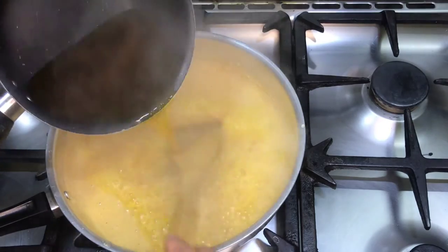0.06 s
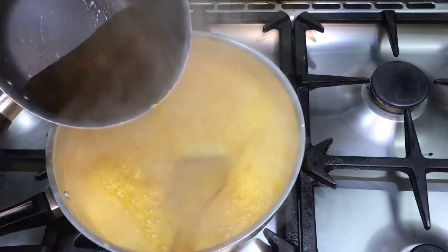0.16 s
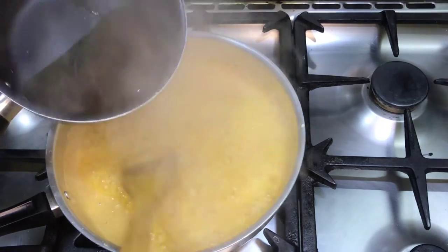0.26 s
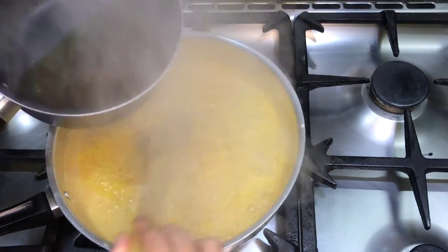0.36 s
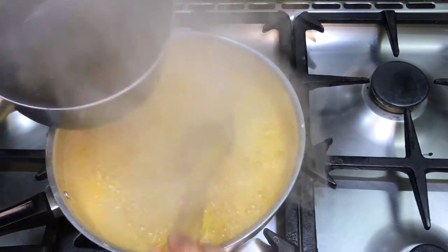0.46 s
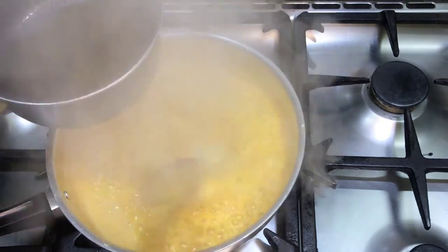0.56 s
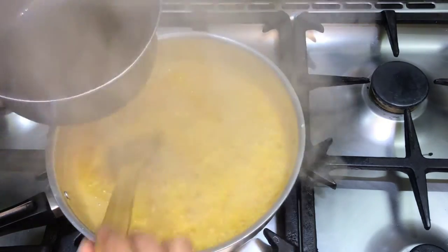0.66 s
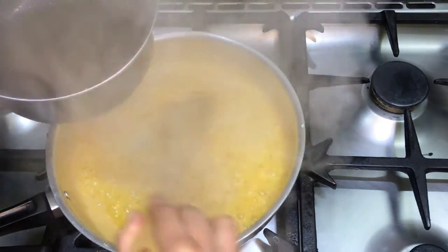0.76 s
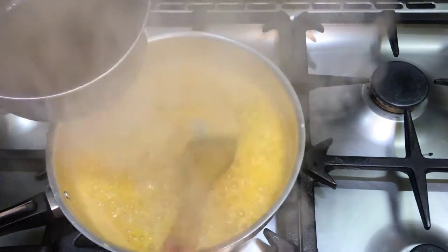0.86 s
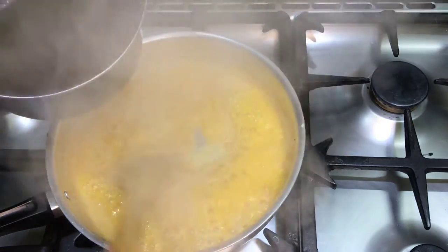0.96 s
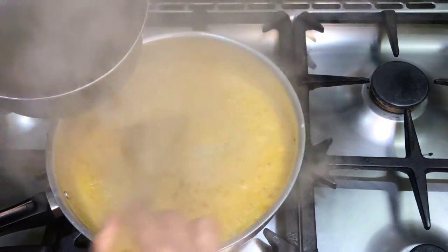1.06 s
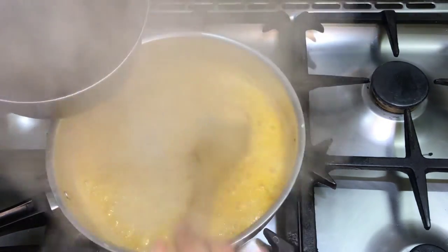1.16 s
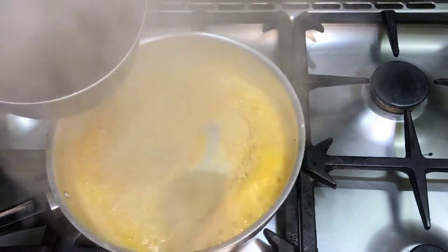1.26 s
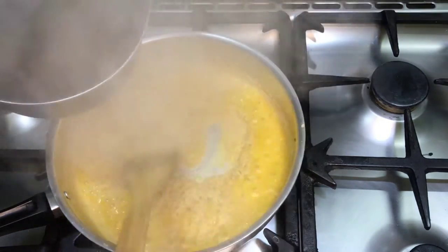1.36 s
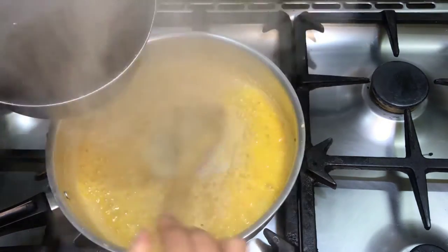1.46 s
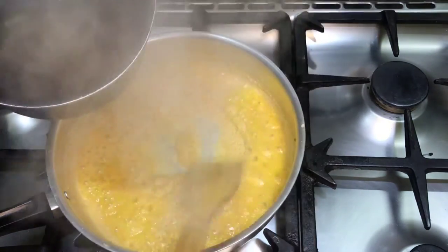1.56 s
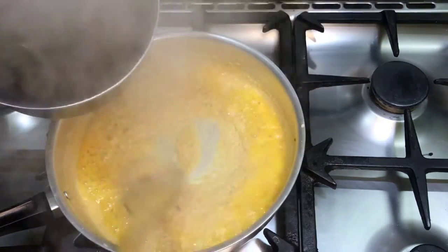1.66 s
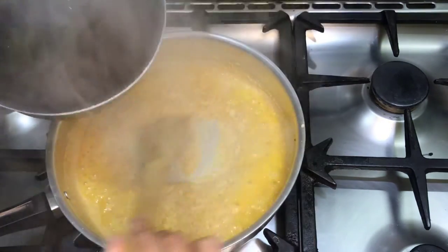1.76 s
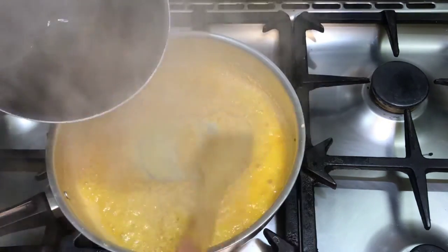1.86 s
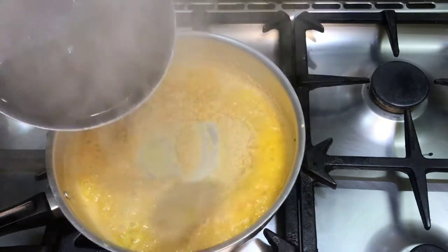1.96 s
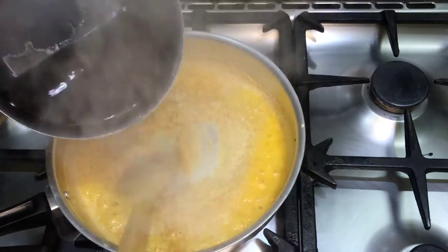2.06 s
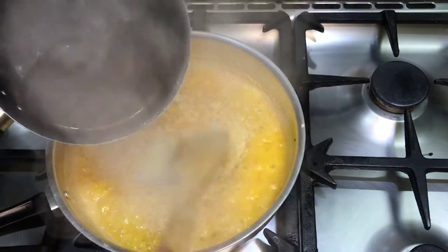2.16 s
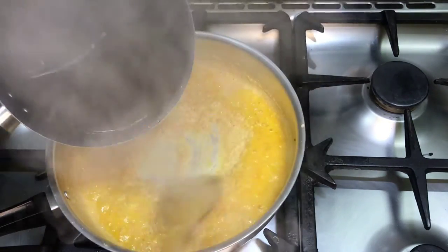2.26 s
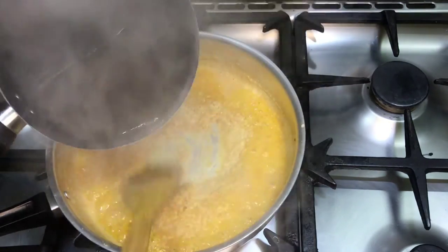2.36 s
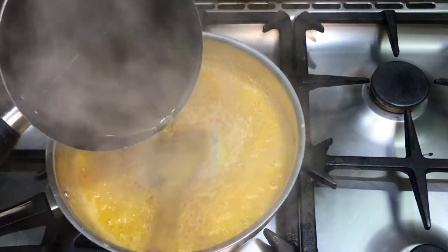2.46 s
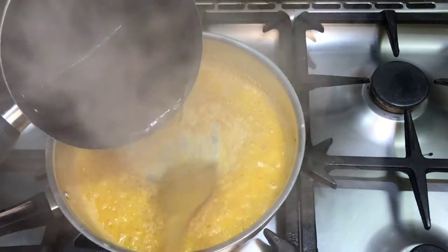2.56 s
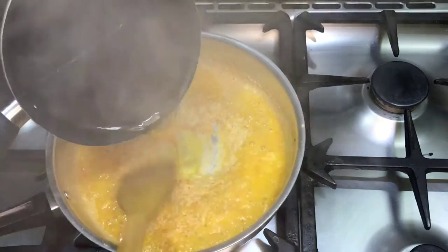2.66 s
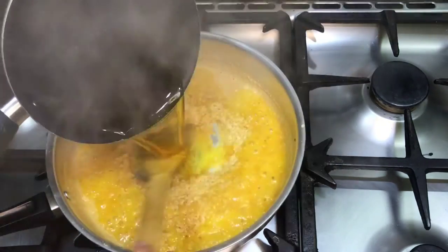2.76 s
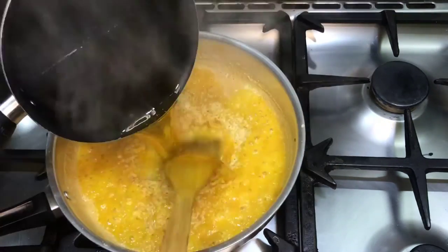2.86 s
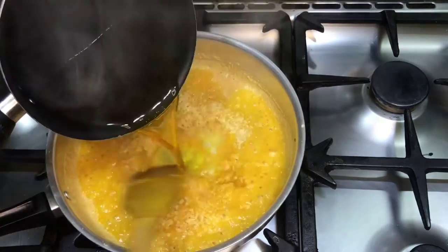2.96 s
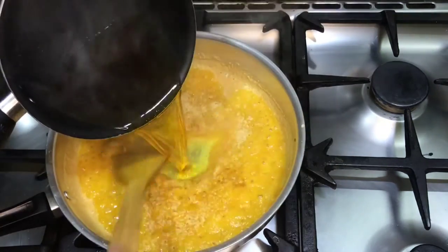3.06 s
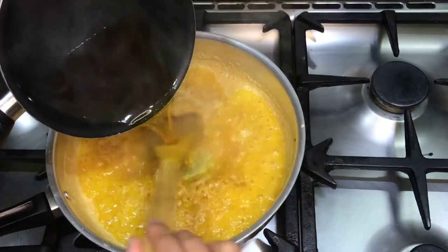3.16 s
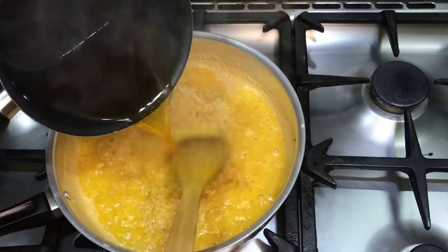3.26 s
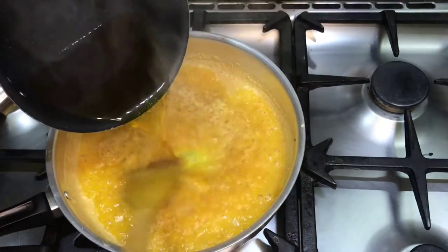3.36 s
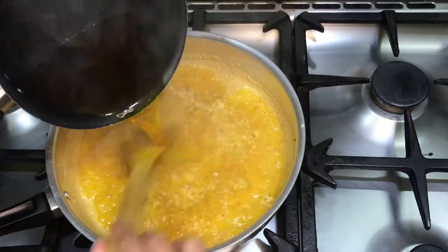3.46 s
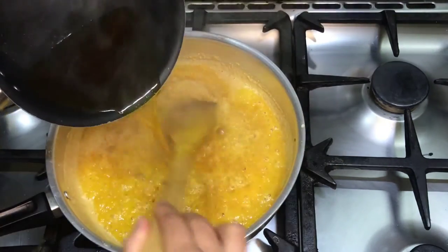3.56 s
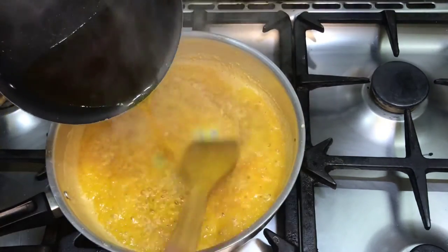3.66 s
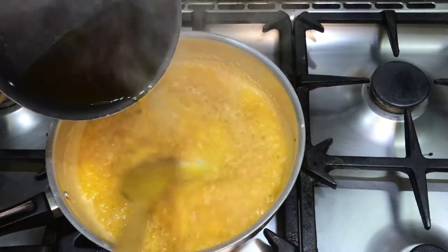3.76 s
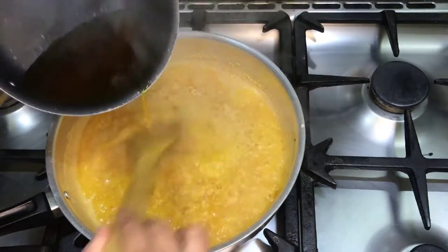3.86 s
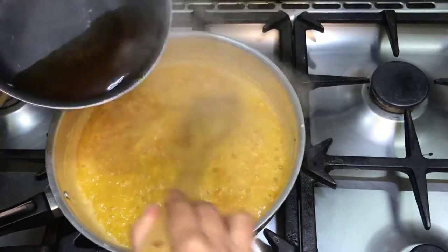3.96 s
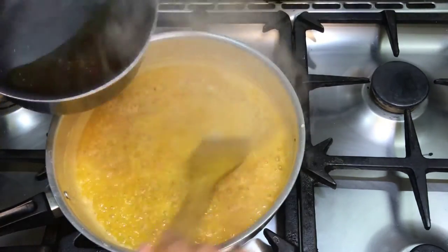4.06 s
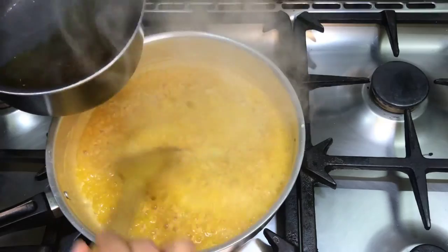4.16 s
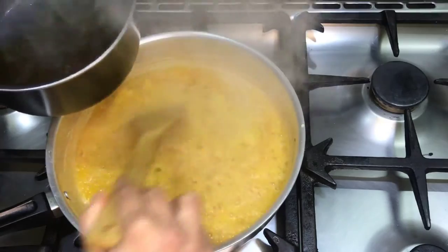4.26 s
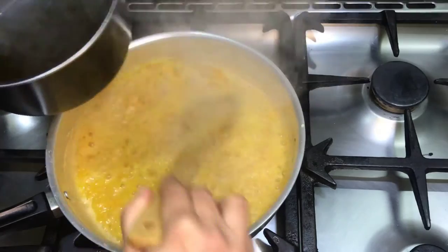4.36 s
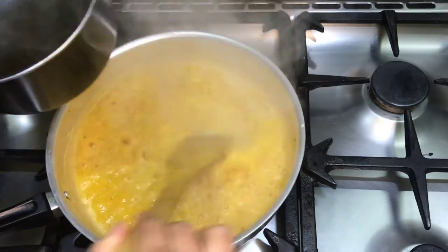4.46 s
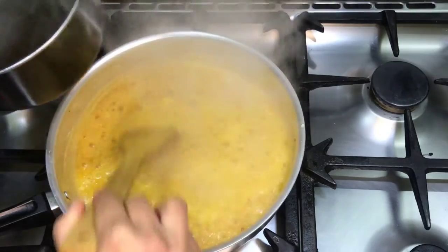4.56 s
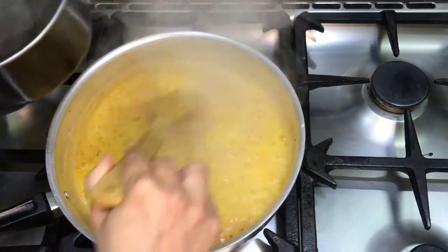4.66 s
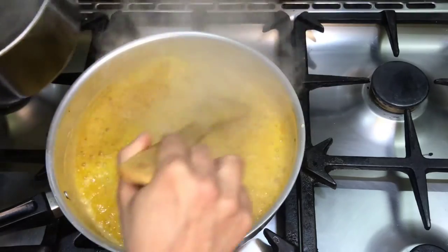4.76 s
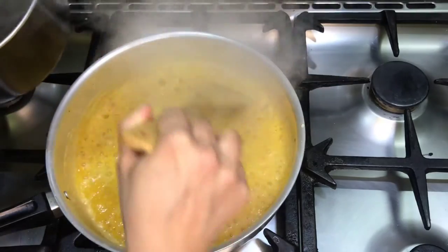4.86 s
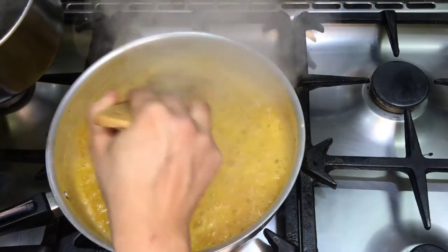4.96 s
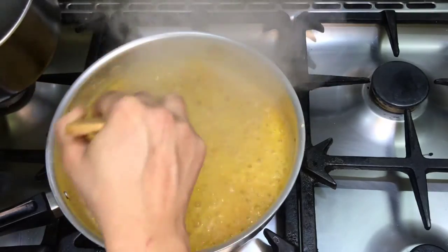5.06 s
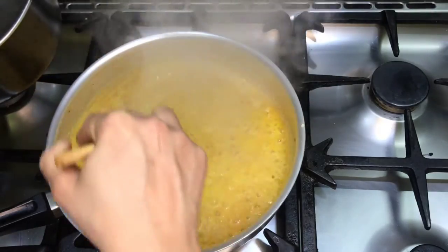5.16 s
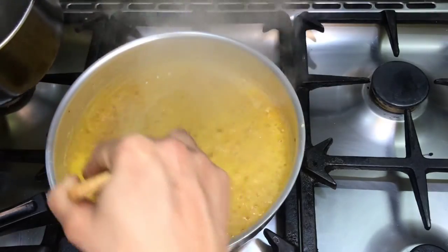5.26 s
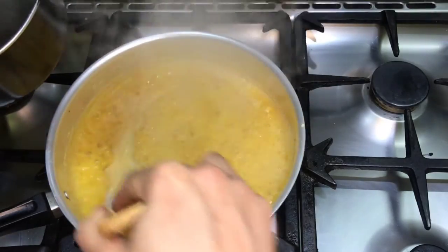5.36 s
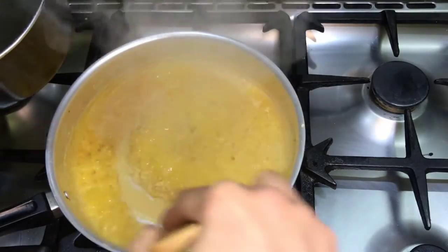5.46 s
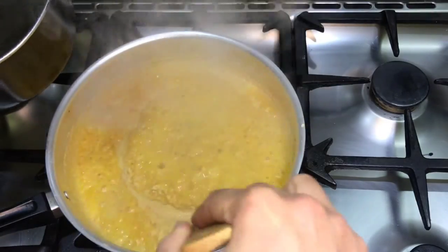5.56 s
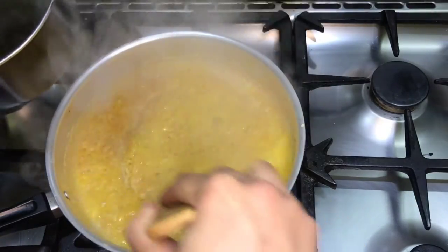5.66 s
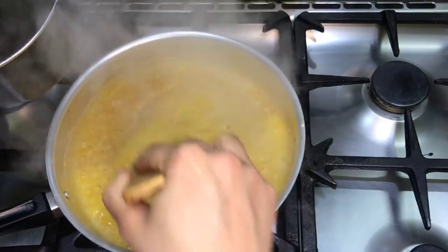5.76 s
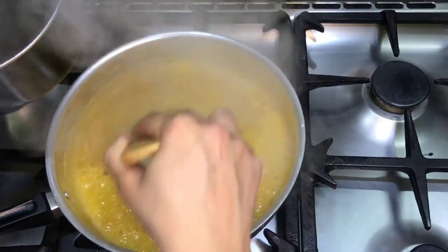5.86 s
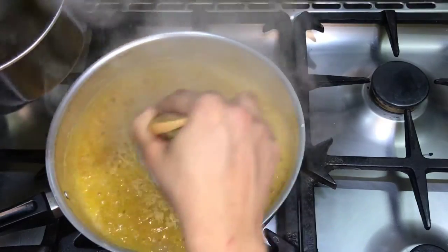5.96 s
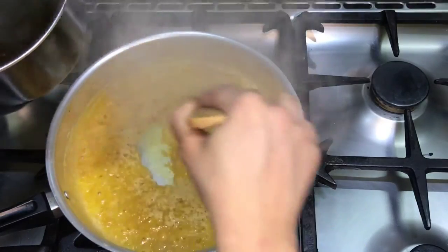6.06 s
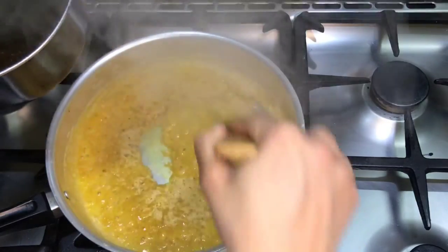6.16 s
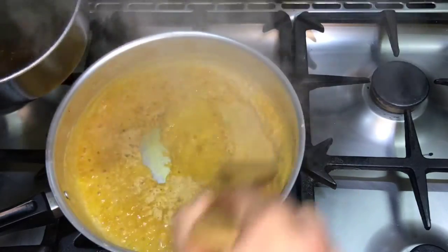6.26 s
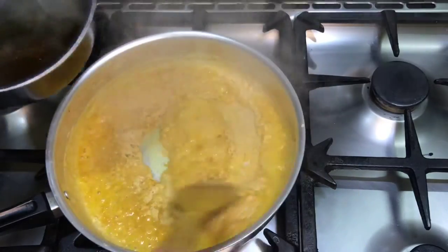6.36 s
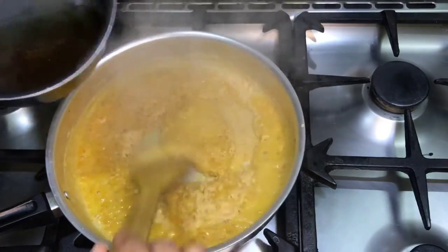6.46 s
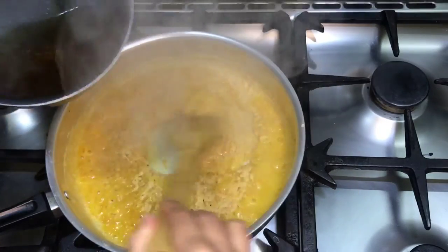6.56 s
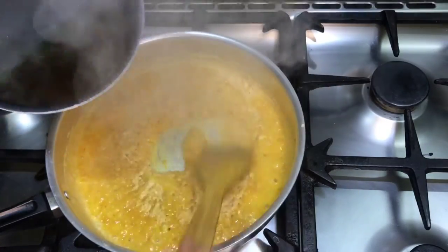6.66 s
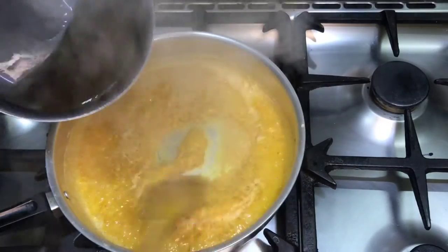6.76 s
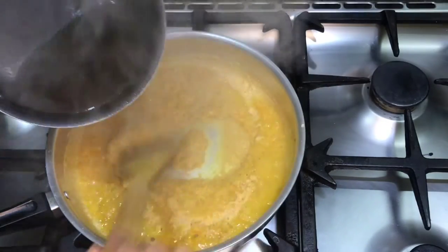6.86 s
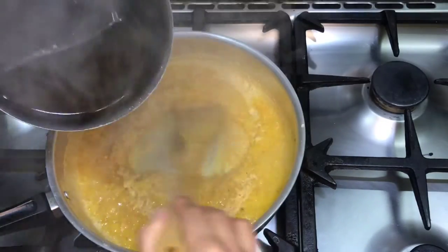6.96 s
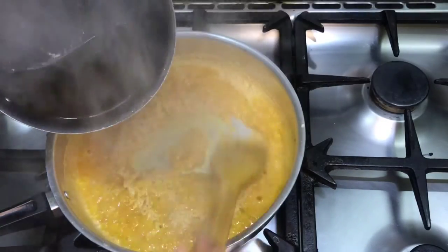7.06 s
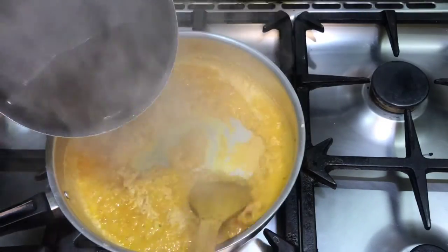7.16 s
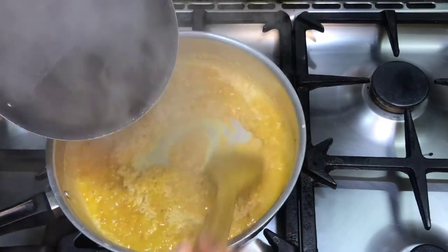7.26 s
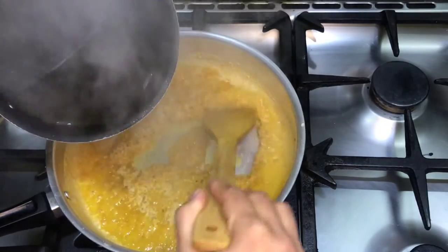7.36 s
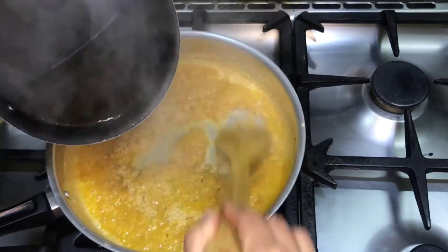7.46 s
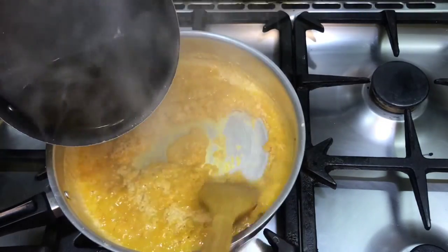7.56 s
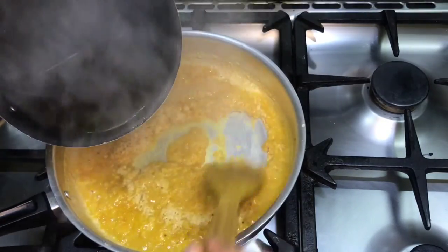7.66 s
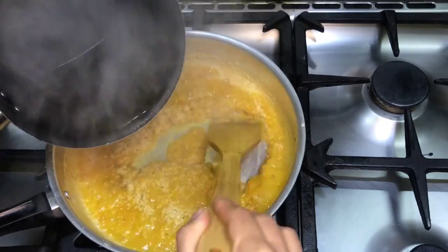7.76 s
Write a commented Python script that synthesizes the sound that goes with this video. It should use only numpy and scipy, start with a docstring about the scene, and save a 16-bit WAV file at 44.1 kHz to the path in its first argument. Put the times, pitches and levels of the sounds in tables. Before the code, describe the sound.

Close, bright sizzling flares and ebbs as syrup hits a bubbling pan twice, with dull spoon knocks and faint low motor drone behind.

```python
"""At a kitchen hob, hot syrup is poured twice into a pan of hot fat, close to a phone with one microphone.
Water flashes to steam: filtered random clicks hiss and fry, and short rising tones boil up through the foam.
Fresh syrup sings through narrow moving resonances, and large bubbles ring out or spit.
A wooden spoon scrapes and knocks the pan: noisy rubbing and decaying tones.
Under it all lies filtered low noise with swelling tones, while motors drone outside as wavering sines."""
import sys
import numpy as np
from scipy import signal
from scipy.fft import rfft, irfft
from scipy.io import wavfile
from scipy.ndimage import uniform_filter1d

SR = 44100
rng = np.random.default_rng(int(sys.argv[2]) if len(sys.argv) > 2 else 0)


def log_audio(samples):
    """Write samples as a 16-bit WAV file to the path given in sys.argv[1]."""
    # one column per channel
    frames = np.atleast_2d(samples).T
    # limit to full scale, then quantise
    limited = np.clip(frames, -1, 1)
    pcm = np.round(limited * 32767).astype(np.int16)
    wavfile.write(sys.argv[1], SR, pcm)


N = 343980
TIME = np.arange(N) / SR  # s
FREQS = np.fft.rfftfreq(N, 1 / SR)  # Hz

# In every table below, the length of a bell-shaped sound is its width at half height.

# low rumble: its tone colour (frequency [Hz], gain [dB])
RUMBLE_COLOUR = [(25, -23), (50, -9), (95, -2), (170, -5), (225, -14), (320, -7.5), (460, -21.5),
                 (680, -9.5), (1200, -19), (4000, -59)]
# pitches the room strengthens (frequency [Hz], width [Hz], gain [dB])
ROOM_MODES = [(102.7, 16, 4.7), (126.4, 3, 5.3), (178.2, 18.5, 7.6)]
# low tones that swell and fade in the rumble (middle [s], length [s], frequency [Hz], level [dB])
RUMBLE_SWELLS = [(0.433, .5, 74, -46), (0.673, 0.32, 175.5, -46), (.7, 0.6, 99, -46),
                 (2.172, 0.33, 132, -43.5), (2.254, 0.22, 102, -45), (2.455, 0.26, 225, -48),
                 (2.546, 0.27, 92, -39.5), (2.775, 0.17, 130.5, -40), (2.95, 0.61, 109.7, -44.5),
                 (3.21, 0.17, 180, -43.5), (4.275, 0.095, 178.5, -41), (4.4, 0.8, 131, -48),
                 (5.934, 0.23, 174.6, -46), (6.11, 0.76, 132, -48), (6.46, 0.52, 109.2, -47)]
# a wavering motor outside (time [s], firing rate [Hz], level [dB])
FAR_MOTOR = [(0, 74.5, -43.5), (.45, 74.5, -45), (.72, 77, -43), (1.0, 73.5, -52), (1.27, 76, -42.5),
             (1.5, 68, -47.5), (1.8, 74, -56), (2.12, 79, -51), (2.4, 73.3, -37.5), (2.65, 78, -46),
             (2.95, 74, -59), (3.35, 74.5, -41), (3.6, 77, -45), (3.95, 76, -48.5), (4.4, 75, -75)]
# strength of that motor's harmonics 1, 2 and 3 (gain [dB])
FAR_HARMONICS_DB = [-22, -0.5, -19]
# a deeper motor swells and fades (middle [s], length [s], pitch [Hz], pitch rise [Hz/s], level [dB])
DEEP_PASSES = [(3.147, 0.59, 57.3, 10, -41), (3.648, 0.45, 61.2, 1, -46), (7.103, 1.5, 57.7, 1, -54)]
RUMBLE_LEVEL_DB = -55  # of the rumble's 80-105 Hz band

# syrup runs into the pan (start [s], length [s])
POURS = [(-0.3, 0.72), (2.873, 0.96)]
POUR_ATTACK_S = 0.051
# fresh syrup meets hot metal and flares up (start [s], hold [s], hiss level [dB], frying level [dB])
FLARES = [(-0.07, 0.11, -23.5, -27.5), (0.148, 0.083, -26.5, -30), (0.37, 0.05, -31.5, -39),
          (0.557, 0.13, -30, -34.5), (0.796, 0.043, -30.5, -35.5), (0.876, 0.023, -25, -35.5),
          (1.03, 0.04, -51, -40), (1.156, 0.52, -31.5, -39), (1.87, 0.22, -38, -46.5),
          (2.812, 0.061, -32.5, -30.5), (2.907, 0.033, -24.5, -47), (2.988, 0.054, -30, -34),
          (3.273, 0.058, -29, -34), (3.533, 0.03, -31, -34.5), (3.683, 0.11, -28, -37),
          (4.055, 0.1, -26.5, -34.5), (4.305, 0.02, -29.5, -37.5), (4.435, 0.046, -24.5, -35.5),
          (4.582, 0.073, -32.5, -53), (4.79, 0.02, -34.5, -58), (5.043, 0.087, -34.5, -63),
          (5.184, 0.57, -31.5, -39), (5.387, 0.2, -30, -40.5), (6.238, 0.16, -29, -40),
          (6.38, 0.5, -42, -42.5), (7.148, 0.036, -32.5, -41), (7.484, 0.14, -33, -43)]
FLARE_ATTACK_S, FLARE_FALL_DB_PER_S = 0.015, 56.5
# the sizzle dips briefly (middle [s], length [s], level change [dB])
SIZZLE_DIPS = [(3.095, 0.031, -6.5), (3.474, 0.03, -3)]
# tone colour of the tiny bursts (frequency [Hz], gain [dB])
HISS_COLOUR = [(2500, -46), (4500, -3.5), (6500, -2.5), (9000, -0.5), (12500, 1.5), (15500, 2)]
# tone colour of the frying (frequency [Hz], gain [dB])
FRY_COLOUR = [(500, -22), (1200, -0.5), (2100, -1.5), (3300, 2.5), (4500, 0.5), (6500, -3.5), (9000, -3.5),
              (15000, -24)]
# tone colour of the boiling (frequency [Hz], gain [dB])
BOIL_COLOUR = [(150, -20), (300, -9.5), (460, -16), (620, -5), (860, -9), (1500, -8.5), (2200, -11),
               (4000, -16)]
# pan wall and hob reflect some pitches and cancel others (frequency [Hz], width [Hz], gain [dB])
PAN_COLOUR = [(1570, 94, -0.5), (2210, 470, 2), (2745, 100, -3.5), (3040, 250, 0.5), (4960, 310, -3),
              (6240, 810, 2), (7770, 630, -1.5), (10440, 850, -4)]
# each layer: level while pouring, cooling speed, simmer level, and simmer change once the pan is fuller
HISS_POUR_DB, HISS_COOL_DB_PER_S, HISS_SIMMER_DB, HISS_FULLER_DB = -40, 0.5, -45.5, 6.5
FRY_POUR_DB, FRY_COOL_DB_PER_S, FRY_SIMMER_DB, FRY_FULLER_DB = -35.5, 14, -42.5, -0.5
BOIL_POUR_DB, BOIL_COOL_DB_PER_S, BOIL_SIMMER_DB, BOIL_FULLER_DB = -36.5, 12.5, -53, 6.5
BOIL_LINGER_S = 0.19  # the foam boils on at full strength after the stream stops
BOIL_SURGE_DB, BOIL_SURGES_PER_S = 0.68, 36
# the spoon opens and closes a hollow in the foam (time [s], centre [Hz], strength [dB])
HOLLOW = [(0, 1480, 7), (.15, 1350, 3), (.28, 1130, 5), (.44, 1230, 6), (.55, 1080, 7), (.68, 1280, 5),
          (.95, 1150, 2), (1.13, 1380, 8), (1.24, 1100, 5), (2.6, 1300, -3), (2.88, 1540, 9),
          (3.0, 1400, 0), (3.17, 1430, 4), (3.36, 1110, 7), (3.42, 1200, 4), (3.49, 1040, 6),
          (3.575, 1400, 11), (3.64, 1300, 4), (3.715, 1120, 10), (3.82, 1120, 0), (3.9, 1320, 6),
          (4.02, 1150, 2), (4.19, 1100, 7), (4.45, 1110, 8), (5.2, 1120, 7), (6.5, 1300, 3)]
HOLLOW_WIDTH_HZ = 320

# fresh syrup sings on bare metal (middle [s], length [s], pitch [Hz], glide [Hz/s], level [dB])
SINGS = [(0.19, 0.17, 3070, -2, -37), (2.822, .03, 2200, -3, -34.5), (2.85, 0.025, 6480, 3500, -26),
         (2.88, 0.051, 3160, 2500, -35), (2.892, 0.074, 2230, 1201, -31.5),
         (2.899, 0.017, 6100, -1500, -24), (2.976, 0.034, 6330, 0, -30), (3.005, 0.07, 2620, 1200, -37),
         (3.01, 0.067, 4130, -2000, -34), (3.04, .03, 6330, 0, -34.5), (3.17, 0.067, 3100, 4000, -38),
         (3.202, 0.13, 2270, 1100, -35.5), (3.33, .04, 6000, 0, -32), (3.352, 0.042, 2520, 800, -36),
         (3.355, 0.05, 3280, 1497, -35), (3.457, 0.12, 3070, -600, -39.5), (3.565, .06, 5600, 1497, -36),
         (3.58, .06, 3230, 0, -44), (3.69, .08, 6200, 3000, -38), (3.77, 0.13, 2090, -600, -39)]
SING_WIDTH_HZ = 150  # for a 2 kHz pocket; higher ones ring wider
SING_WANDER, SING_SPUTTER_DB = .014, 1  # pitch wobble as a share of the pitch; spread of the level
# single large bubbles surface (start [s], pitch [Hz], decay time [s], level [dB])
BLIPS = [(1.119, 1305, 0.07, -35), (1.441, 1170, 0.065, -36), (1.652, 1180, .035, -38),
         (1.798, 1320, 0.05, -37), (2.16, 1340, 0.043, -38.5), (3.245, 600, .05, -36),
         (4.812, 1050, 0.053, -39), (5.066, 1104, 0.065, -41), (5.175, 1050, 0.05, -33)]
BLIP_RISE_PER_S, BLIP_ROUGHNESS = 4.35, 0.57  # pitch rise and level wobble, as shares

# the spoon bites on the bottom and drags (start [s], length [s], level [dB])
SCRAPES = [(1.25, 0.054, -37.5), (1.35, 0.14, -43), (1.6, 0.24, -45), (1.8, 0.11, -53), (2.03, 0.18, -47),
           (2.35, 0.12, -46), (2.62, 0.025, -47), (2.68, 0.04, -46), (6.475, 0.057, -45),
           (6.545, 0.13, -47), (6.808, 0.07, -47.5), (6.9, 0.023, -40), (6.936, .035, -39.5),
           (6.99, 0.11, -52.5)]
# what the dragging spoon rings (frequency [Hz], width [Hz], gain [dB])
SCRAPE_MODES = [(684, 37, 7.5), (755, 60, 5.5), (1300, 330, -3.5), (2090, 150, -29)]
# the spoon's edge slides on after a knock (start [s], length [s], level [dB])
SLIDES = [(6.905, 0.066, -43), (7.325, 0.055, -38.5), (7.395, .02, -47), (7.435, 0.06, -48),
          (7.524, 0.015, -42), (7.645, .025, -53)]
# what the sliding edge rings (frequency [Hz], width [Hz], gain [dB])
SLIDE_MODES = [(1310, 260, 1), (2210, 280, -3.5)]
# the spoon judders along the wall (start [s], length [s], level [dB])
JUDDERS = [(4.96, 0.06, -48), (5.025, 0.12, -41.5), (7.32, 0.078, -46), (7.45, 0.06, -46)]
# what the judder rings (frequency [Hz], width [Hz], gain [dB])
JUDDER_MODES = [(171, 25, 11), (267, 57, 10), (405, 120, 9.5), (650, 78, 10), (1140, 550, -7),
                (2060, 300, -16)]
# the spoon catches and jumps (time [s], pitch [Hz], level [dB])
JUMPS = [(1.252, 687, -37), (1.448, 670, -31), (1.612, 678, -33), (1.634, 700, -33), (2.412, 690, -32.5),
         (2.468, 720, -34), (6.568, 810, -37), (6.817, 725, -24.5), (6.838, 725, -25.5)]
# a jump rings the bottom (multiple of its pitch, decay time [s], gain [dB], lag [s])
JUMP_MODES = [(1, 0.025, -3, 0.00097), (0.921, 0.022, -12, 0.001), (1.8, .02, -14, 0.0002)]
# the spoon knocks the pan; levels before the trims below (time [s], tap [dB], thud of pan and grate [dB])
KNOCKS = [(1.814, -30, -44), (4.921, -38, -31), (4.949, -52, -34), (4.977, -47, -37), (5.011, -40, -33),
          (7.222, -30, -33), (7.306, -22.5, -26.5), (7.4225, -23, -27), (7.525, -33, -41),
          (7.639, -25.5, -29.5), (7.78, -20.5, -28)]
TAP_TRIM_DB, THUD_TRIM_DB = 7.5, -3.0
# the tap of wood on the pan (frequency [Hz], gain [dB])
TAP_COLOUR = [(500, -19), (850, -2), (1300, 7), (1550, -1), (2300, -6), (3200, -8), (7000, -15)]
# the pan rocks on its grate; the lows come late (frequency [Hz], decay time [s], gain [dB], lag [s])
THUD_MODES = [(74.4, 0.23, -12, 0.0093), (176, 0.075, -0.5, 0.0145), (215, 0.028, -11, 0.0072),
              (313, 0.028, -12, 0.0037), (388, 0.034, -6.5, 0.00207), (625, 0.05, -11, 0.0016),
              (1330, 0.02, -9, 0.00056)]
RUB_ATTACK_S, RUB_GRIP_DB, RUB_GRIPS_PER_S = .002, 1, 42

# big bubbles spit (time [s], level [dB])
SPITS = [(2.3268, -16), (2.89, -20), (4.052, -40)]
# one spit, a snap and then its cavity (frequency [Hz], decay time [s], gain [dB], lag [s])
SPIT_MODES = [(6240, 0.0025, -3, 0.000087), (4400, .0015, -5, 0.0001), (9000, 0.00091, -3, .0001),
              (1870, 0.01, -17, 0.00018), (1190, 0.0086, -10, 0.00054), (644, 0.028, -17, 0.002)]
KITCHEN_WET_DB = -19  # level of the room's tail
TOP_HZ = 15550  # where the phone cuts the top


def undb(db):
    """Turn decibels into a plain multiplier."""
    return 10 ** (np.asarray(db) / 20)


def unit(x):
    """Scale a sound to a standard deviation of 1."""
    return x / np.std(x)


def unit_gain(db):
    """A wavering gain with a mean power of 1."""
    gain = undb(db)
    return gain / np.sqrt(np.mean(gain ** 2))


def band_unit(x, band):
    """Scale a sound so that the part inside the band (low, high) in Hz has an rms of 1."""
    inside = (FREQS > band[0]) & (FREQS < band[1])
    return x / np.std(irfft(rfft(x) * inside, N))


def curves(table):
    """The columns of a table, joined by straight lines in time."""
    s, *columns = np.transpose(table)
    return [np.interp(TIME, s, column) for column in columns]


def colour(x, points, bumps):
    """Filter by a smooth tone colour with a few peaks and dips on it."""
    hz, db = np.transpose(points)
    gain_db = np.interp(np.log(FREQS + 1), np.log(hz), db)
    # the sound fades away below the first point
    gain_db = gain_db - 40 * np.log10(1 + (hz[0] / (FREQS + 1) / 2) ** 2)
    for centre, width, bump_db in bumps:
        gain_db = gain_db + bump_db * .5 ** ((2 * (FREQS - centre) / width) ** 2)
    return irfft(rfft(x) * undb(gain_db), N)


def resonate(x, hz, width_hz):
    """Two-pole resonance, gain 1 at its centre."""
    return signal.lfilter(*signal.iirpeak(hz, hz / width_hz, fs=SR), x)


def pocket(x, hz, width_hz, order):
    """A resonance whose centre moves: shift it down to zero, keep the slow part, shift it back."""
    turn = np.exp(2j * np.pi * np.cumsum(hz) / SR)
    low_pass = signal.butter(order, width_hz / 2, fs=SR)
    return (signal.lfilter(*low_pass, x / turn) * turn).real


def walk(rate):
    """Smooth random wandering with a spread of 1; a higher rate wanders faster."""
    size = max(int(SR / rate), 2)
    noise = rng.standard_normal(N)
    return unit(uniform_filter1d(uniform_filter1d(noise, size), size))


def bursts(rate, spread_db):
    """Random clicks, so many a second on average; most are small and a few are large."""
    size = undb(spread_db * np.minimum(rng.exponential(size=N), 5))
    return (rng.random(N) < rate / SR) * size * rng.choice([-1, 1], N)


def swell(s, length):
    """A bell-shaped rise and fall centred on s."""
    return .5 ** np.minimum((2 * (TIME - s) / length) ** 2, 60)


def envelope(start, hold, attack_s, fall_db_per_s):
    """Power that rises at the start, holds, then falls by so many dB a second."""
    rise = .5 + .5 * np.tanh((TIME - start) / attack_s / 2)
    return rise * undb(-fall_db_per_s * np.maximum(TIME - start - hold, 0)) ** 2


def ripening(t, t60):
    """A ring that builds up to 1, then dies away; t60 sets how fast."""
    age = np.log(1000) * t / t60
    return age * np.exp(1 - age)


def strike(hits, modes):
    """Blows (time, dB) set modes ringing; each starts after its lag, slightly off pitch, builds up and dies."""
    out, t = np.zeros(N + SR), np.arange(SR // 3) / SR
    for s, db in hits:
        for hz, t60, mode_db, lag in modes:
            start = int(max(s + lag, 0) * SR)
            detune = 1 + 0.0071 * rng.standard_normal()
            tone = np.sin(2 * np.pi * hz * detune * t)
            out[start:start + len(t)] += undb(db + mode_db) * ripening(t, t60) * tone
    return out[:N]


def low_rumble():
    """Traffic comes through the walls as low noise, strengthened at the room's own pitches."""
    rumble = colour(rng.standard_normal(N), RUMBLE_COLOUR, ROOM_MODES)
    return undb(RUMBLE_LEVEL_DB) * band_unit(rumble, (80, 105))


def swelling_tones():
    """Steady low sine tones swell and fade in the rumble."""
    out = 0
    for s, length, hz, db in RUMBLE_SWELLS:
        out = out + undb(db) * swell(s, length) * np.sin(2 * np.pi * (hz * TIME + rng.random()))
    return out


def motors():
    """One motor drones in three harmonics, a deeper one speeds up as it passes; both waver in pitch."""
    waver = 1 + 0.0057 * walk(8.7)

    def turn(hz):
        """Add up a wavering pitch into the phase of a wave."""
        return 2 * np.pi * np.cumsum(hz * waver) / SR

    far_hz, far_db = curves(FAR_MOTOR)
    out = 0
    for multiple, db in enumerate(FAR_HARMONICS_DB, 1):
        out = out + undb(far_db + db) * np.sin(multiple * turn(far_hz))
    for s, length, hz, rise, db in DEEP_PASSES:
        out = out + undb(db) * swell(s, length) * np.sin(turn(hz + rise * (TIME - s)))
    return out


def outside():
    """Rumble, swelling tones and motor drones; the tones and drones share a slow wobble in level."""
    return low_rumble() + (swelling_tones() + motors()) * undb(0.57 * walk(12.0))


def heat(pour_db, cool_db_per_s, simmer_db, fuller_db, linger_s=0):
    """Power of one layer: pours drive it up, it cools to a simmer that shifts as the last pour fills the pan."""
    pouring = sum(envelope(start, length + linger_s, POUR_ATTACK_S, cool_db_per_s) for start, length in POURS)
    start, length = POURS[-1]
    filled = np.clip((TIME - start) / length, 0, 1)
    return undb(pour_db) ** 2 * pouring + undb(simmer_db + fuller_db * filled) ** 2


def churn(x, depth_db):
    """Cavities open and close in the stirred foam, so each pitch region swells on its own."""
    centres = np.geomspace(900, 9000, 14)  # Hz
    spectrum = rfft(x)
    out = 0
    for row in np.eye(len(centres)):
        share = np.interp(FREQS, centres, row)
        out = out + irfft(spectrum * share, N) * undb(depth_db * walk(38))
    return out


def sizzle():
    """Tiny steam bursts hiss, larger ones fry; both come in flurries, and lone crackles stand out."""
    hiss_power = heat(HISS_POUR_DB, HISS_COOL_DB_PER_S, HISS_SIMMER_DB, HISS_FULLER_DB)
    fry_power = heat(FRY_POUR_DB, FRY_COOL_DB_PER_S, FRY_SIMMER_DB, FRY_FULLER_DB)
    for start, hold, hiss_db, fry_db in FLARES:
        flare = envelope(start, hold, FLARE_ATTACK_S, FLARE_FALL_DB_PER_S)
        hiss_power = hiss_power + flare * undb(hiss_db) ** 2
        fry_power = fry_power + flare * undb(fry_db) ** 2
    flurry_db = 0.56 * walk(92) + 0.42 * walk(39)
    dip_db = sum(db * swell(s, length) for s, length, db in SIZZLE_DIPS)
    hiss = colour(bursts(16000, 2.05), HISS_COLOUR, PAN_COLOUR)
    crackles = undb(-7.0) * bursts(65, 1.9)
    fry = colour(bursts(9000, 1.3) + crackles, FRY_COLOUR, PAN_COLOUR)
    # the foam churns most around 4.1 s
    fry = churn(fry, depth_db=1.08 + 2.0 * swell(4.1, 0.32))
    hiss = band_unit(hiss, (8000, 15000)) * np.sqrt(hiss_power)
    fry = band_unit(fry, (2000, 5000)) * np.sqrt(fry_power)
    return (hiss + fry) * undb(flurry_db + dip_db)


def boil():
    """Bubbles of many sizes ring briefly, rising in pitch as they surface; a shifting hollow makes them gurgle."""
    out = 0
    for hz in np.geomspace(250, 3200, 32):
        life = np.linspace(0, 1, int(10 * SR / hz))  # from birth to end
        phase = 2 * np.pi * np.cumsum(hz * (1 + .25 * life)) / SR
        bubble = np.sin(phase) * np.exp(-np.log(1000) * life)
        out = out + hz * signal.oaconvolve(bursts(130, 1.3), bubble)[:N]
    hollow_hz, hollow_db = curves(HOLLOW)
    # doubled because a pocket passes half the amplitude
    out = out + 2 * undb(hollow_db) * pocket(out, hollow_hz, HOLLOW_WIDTH_HZ, order=1)
    foam = band_unit(colour(out, BOIL_COLOUR, PAN_COLOUR), (850, 1600))
    power = heat(BOIL_POUR_DB, BOIL_COOL_DB_PER_S, BOIL_SIMMER_DB, BOIL_FULLER_DB, BOIL_LINGER_S)
    return foam * np.sqrt(power) * undb(BOIL_SURGE_DB * walk(BOIL_SURGES_PER_S))


def singing():
    """Steam sputters from under fresh syrup and rings; the pitch slides and wobbles as the pocket changes size."""
    out, steam, wobble = 0, bursts(3000, 1.2), 1 + SING_WANDER * walk(70)
    for s, length, hz, glide, db in SINGS:
        pitch = (hz + glide * np.clip(TIME - s, -length, length)) * wobble
        ring = pocket(steam, pitch, SING_WIDTH_HZ * np.sqrt(hz / 2000), order=2)
        out = out + unit(ring) * undb(db) * swell(s, length)
    return out * unit_gain(SING_SPUTTER_DB * walk(110))


def blips():
    """Single large bubbles ring out, rising in pitch as they surface; the foam around them roughens the ring."""
    out, t = np.zeros(N + SR), np.arange(SR // 5) / SR
    for s, hz, t60, db in BLIPS:
        start = int(s * SR)
        phase = 2 * np.pi * hz * (t + BLIP_RISE_PER_S * t ** 2 / 2)
        out[start:start + len(t)] += undb(db) * ripening(t, t60) * np.sin(phase)
    return out[:N] * (1 + BLIP_ROUGHNESS * walk(350))


def rub(strokes, modes):
    """Wood bites on metal, then sticks and slips with an uneven, fading grip; the slips ring the pan's modes."""
    slips = bursts(1200, 0.8)
    ring, pressure = 0, 0
    for hz, width, db in modes:
        ring = ring + undb(db) * resonate(resonate(slips, hz, width), hz, 3 * width)
    for s, length, db in strokes:
        bite = .5 + .5 * np.tanh((TIME - s) / RUB_ATTACK_S)
        # only the falling half of the bell is heard, so it is twice as long
        pressure = pressure + undb(db) * bite * swell(s, 2 * length)
    return unit(ring) * pressure * unit_gain(RUB_GRIP_DB * walk(RUB_GRIPS_PER_S))


def jump():
    """The spoon catches and jumps, which rings the pan's bottom at a few multiples of one pitch."""
    out = 0
    for s, hz, db in JUMPS:
        modes = [(hz * multiple, *rest) for multiple, *rest in JUMP_MODES]
        out = out + strike([(s, db)], modes)
    return out


def tap(hits, t60=0.065, snap=6.6):
    """Wood meets metal: one sharp contact, then a short, dull rattle."""
    out, t = np.zeros(N + SR), np.arange(SR // 10) / SR
    for s, db in hits:
        start = int(s * SR)
        out[start] += undb(db) * snap
        rattle = rng.standard_normal(len(t)) * np.exp(-np.log(1000) * t / t60)
        out[start:start + len(t)] += undb(db - 9.5) * rattle
    return colour(out[:N], TAP_COLOUR, PAN_COLOUR)


def spoon():
    """The spoon scrapes, slides, judders and jumps; its knocks tap the metal and rock the pan on its grate."""
    drags = rub(SCRAPES, SCRAPE_MODES) + rub(SLIDES, SLIDE_MODES) + rub(JUDDERS, JUDDER_MODES)
    taps = tap([(s, tap_db) for s, tap_db, _ in KNOCKS])
    thuds = strike([(s, thud_db) for s, _, thud_db in KNOCKS], THUD_MODES)
    return drags + jump() + undb(TAP_TRIM_DB) * taps + undb(THUD_TRIM_DB) * thuds


def spits():
    """Big bubbles spit: a sharp snap, then the lower ring of the cavity."""
    return strike(SPITS, SPIT_MODES)


def kitchen(x, t60=0.089):
    """Hard walls add a short diffuse tail: fading noise that starts after 3 ms."""
    t = np.arange(SR // 2) / SR
    tail = rng.standard_normal(len(t)) * np.exp(-np.log(1000) * t / t60) * (t > .003)
    tail = tail / np.linalg.norm(tail)
    return x + undb(KITCHEN_WET_DB) * signal.oaconvolve(x, tail)[:N]


def scene():
    """Everything reaches one microphone, so both channels are alike."""
    pan = sizzle() + boil() + singing() + blips() + spoon() + spits()
    return np.tile(outside() + kitchen(pan), (2, 1))


def record(dry):
    """The phone cuts the top steeply."""
    top_cut = signal.ellip(12, .1, 80, TOP_HZ, fs=SR, output="sos")
    return signal.sosfilt(top_cut, dry)


dry = scene()
out = record(dry)
log_audio(out)
```